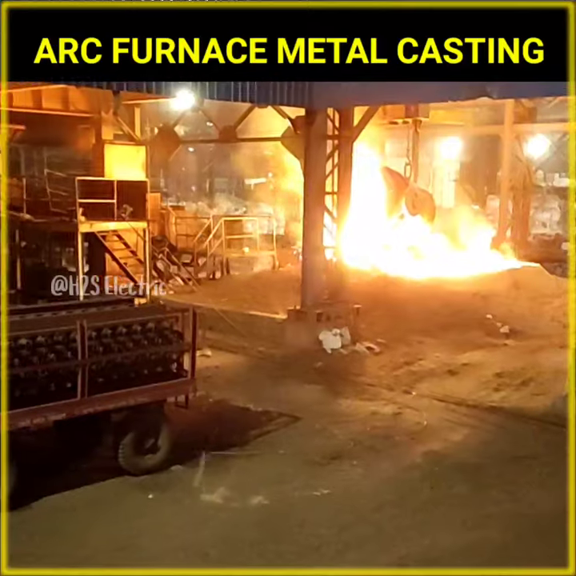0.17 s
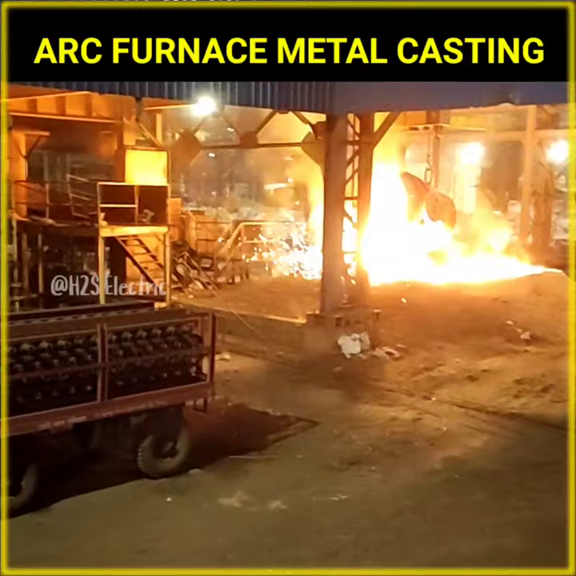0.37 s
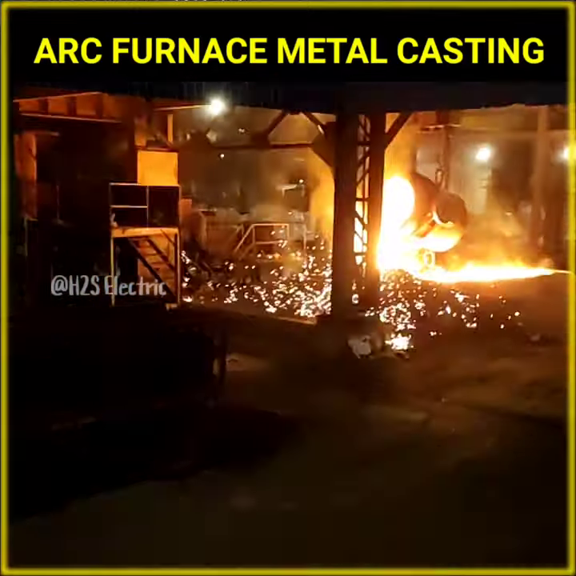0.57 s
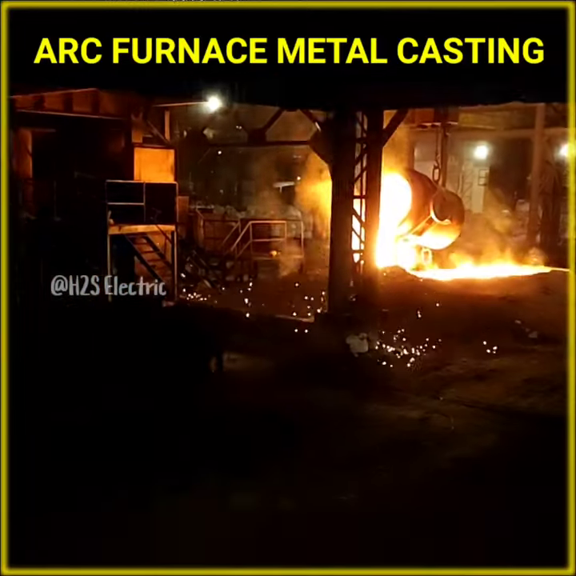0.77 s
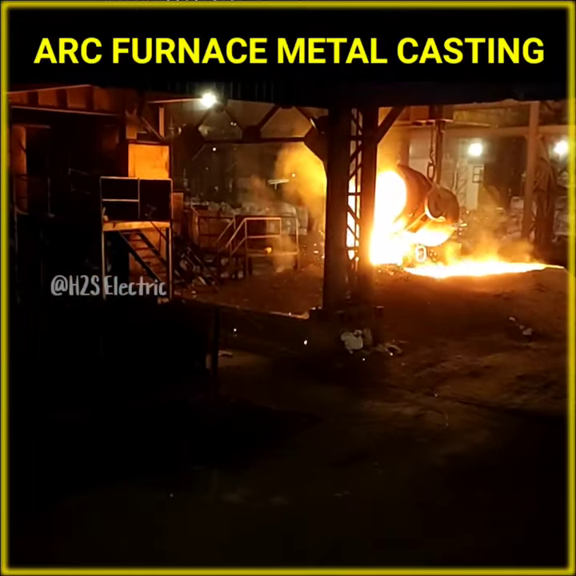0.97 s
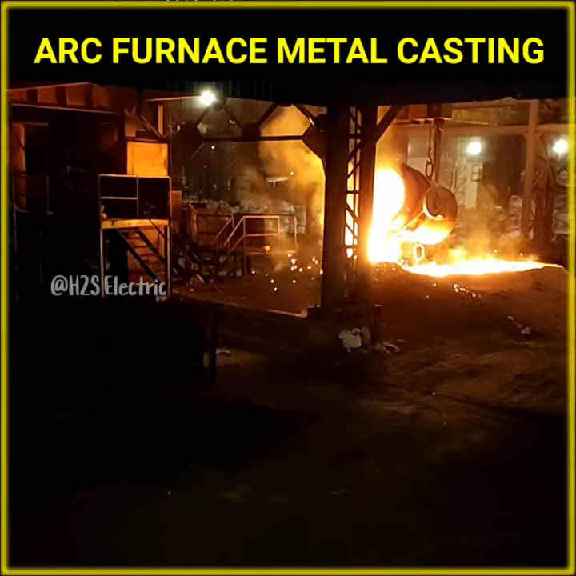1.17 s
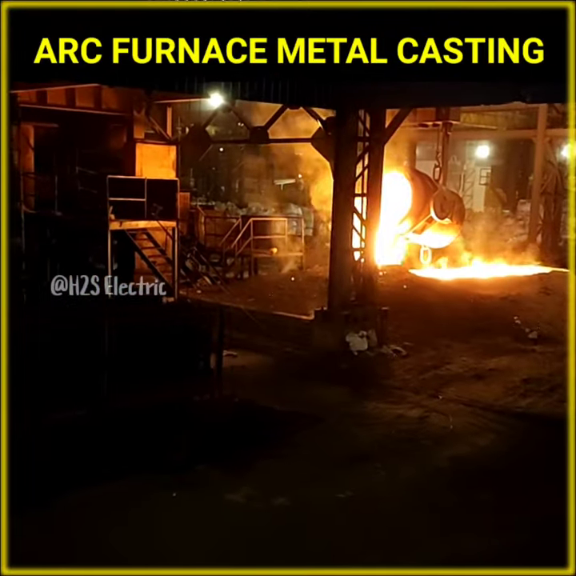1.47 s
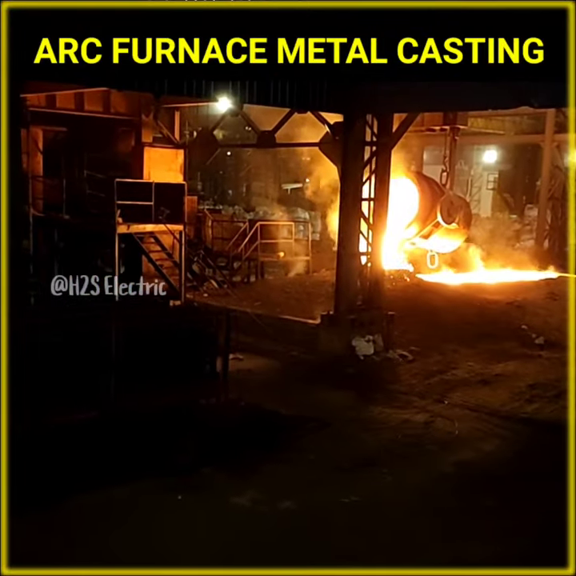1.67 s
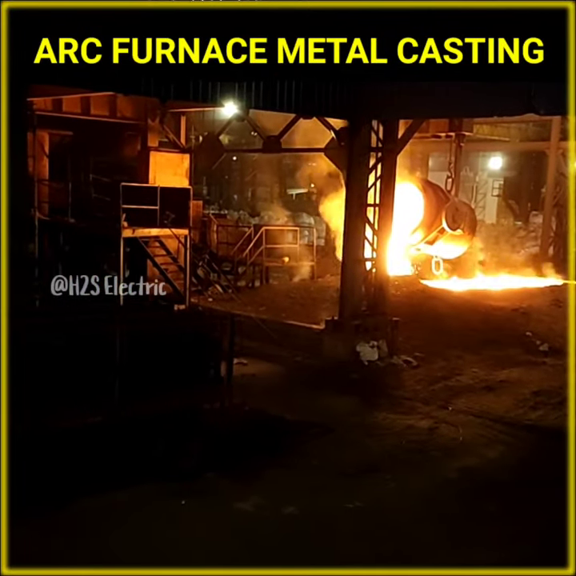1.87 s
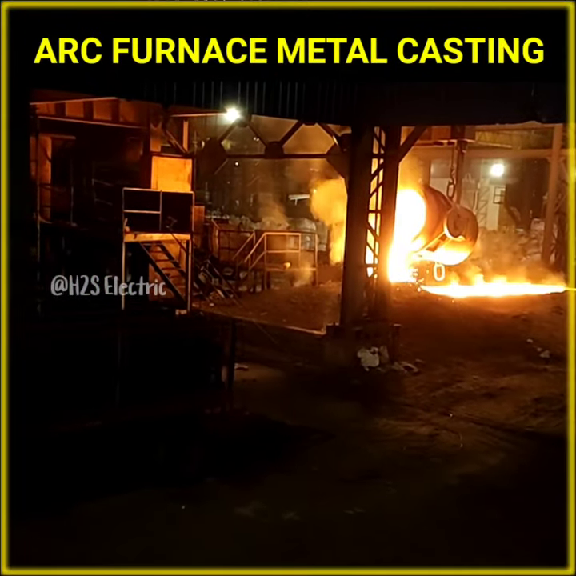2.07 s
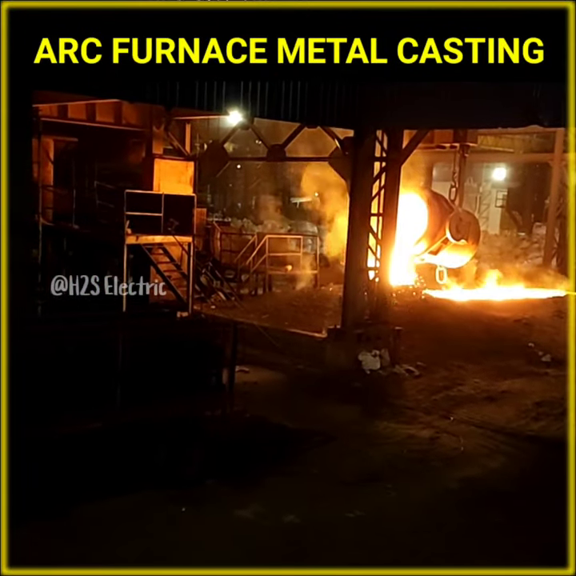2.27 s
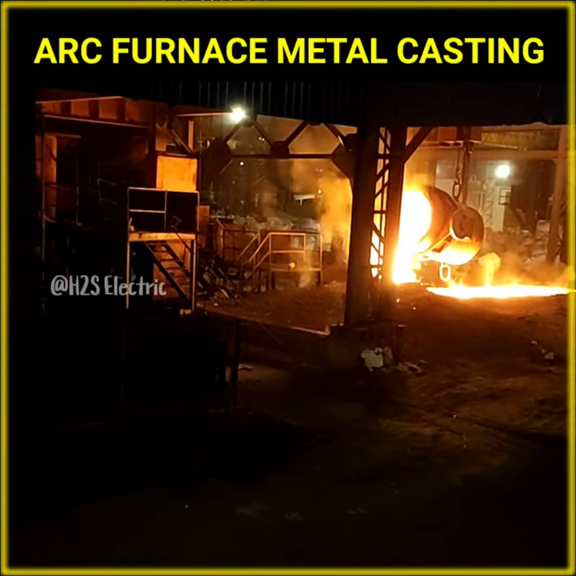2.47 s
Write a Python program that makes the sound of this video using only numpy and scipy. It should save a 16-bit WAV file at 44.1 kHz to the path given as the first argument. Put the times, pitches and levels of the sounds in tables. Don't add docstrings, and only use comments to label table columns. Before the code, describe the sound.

After a brief silence, a loud hollow furnace roar comes in and continues, fluttering unevenly with humming motors, airy hiss and faint steam spits, then a sharp puff of compressed air late on, heard by a phone in an echoing hall.

```python
import sys
import numpy as np
from scipy import signal
from scipy.io import wavfile
from scipy.ndimage import uniform_filter1d, minimum_filter1d

SR = 44100
rng = np.random.default_rng(int(sys.argv[2]) if len(sys.argv) > 2 else 0)


def to_wav(s):
    ch = np.atleast_2d(s).T
    pcm = np.round(np.clip(ch, -1, 1) * 32767)
    wavfile.write(sys.argv[1], SR, pcm.astype(np.int16))


def field_ratio(decibels):
    return 10 ** (np.asarray(decibels, dtype=float) / 20)


N = 115983


# pitch_hz, level_db (per Hz)
ROAR_COLOUR = [(12, -75), (20, -29), (86, -43), (195, -17.5), (259, -13), (350, -8), (433, -9.5),
               (586, -12.5), (1400, -21.5), (1820, -21.5), (3080, -120)]
# pitch_hz, width_hz, level_db
DUCT_BOOM = [
    (351.8, 27, -25),
    (329, 26, -30.5),
    (388, 6.7, -30),
]
# pitch_hz, width_hz, level_db
MOTOR_HUM = [(182, 5, -50), (202.5, 6, -38.5), (404, 8, -32), (495, 7, -37), (593, 9, -36.5),
             (808, 7, -40.5), (1217, 12, -47), (3570, 8, -61), (3746, 8, -64), (4269, 8, -66),
             (4576, 8, -66)]


def roar():
    tones_table = DUCT_BOOM + MOTOR_HUM

    def body_db(hz, t):
        return read(ROAR_COLOUR, hz)[:, None] + 2.0 * patches(hz, t, 12, 8) + 0.84 * draught(t)

    def tones_db(hz, t):
        power = 0
        for pitch_hz, width_hz, db in tones_table:
            off_pitch = 2 * (hz - pitch_hz) / width_hz
            power = power + field_ratio(db) ** 2 / width_hz / (1 + off_pitch ** 2) ** 2
        silent_top = 240 * (hz > 6000)[:, None]
        return 10 * np.log10(power)[:, None] + 0 * t - silent_top

    body = ports(body_db, 2048)
    low = signal.sosfilt(signal.butter(2, 1300, fs=SR, output="sos"), body)
    tones = ports(tones_db, 16384)
    tones_power = sum(field_ratio(db) ** 2 for _, _, db in tones_table)
    return field_ratio(-22) * evened(low) + np.sqrt(tones_power) * evened(tones)


# start_s, level_db (peak), pitch_hz
PUFF_EVENTS = [(0.211, -13, 347), (0.229, -12, 334), (0.364, -14, 423), (0.419, -7.5, 405),
               (0.461, -15, 352), (0.53, -11, 341), (0.586, -18, 360), (0.683, -14, 345), (0.761, -18, 336),
               (0.834, -6, 364.5), (0.909, -16, 349), (1.007, -12, 359), (1.037, -2.5, 356.6),
               (1.26, -12, 338), (1.287, -15, 398), (1.343, -14, 360), (1.442, -9, 353.5), (1.51, -18, 399),
               (1.535, -11, 353), (1.599, -13, 388), (1.657, -11.5, 380), (1.683, -16, 367),
               (1.725, -14, 349), (1.751, -14.5, 385), (1.801, -8.5, 357), (1.847, -11, 390),
               (1.908, -8.5, 351), (2.02, -17, 381), (2.083, -14.5, 394), (2.126, -11, 340),
               (2.165, -23, 326), (2.19, -12, 352.3), (2.261, -19, 336), (2.301, -10.5, 368),
               (2.334, -13.5, 335), (2.383, -19, 394), (2.474, -18, 388), (2.514, -11.5, 349),
               (2.565, -12, 328), (2.601, -15.5, 368)]


def puffs():
    rise_s, t60_s, trim_db = 0.0075, 0.16, -1.5
    t = np.arange(SR // 4) / SR
    out = np.zeros(N + SR)
    turns = rng.random(len(PUFF_EVENTS))
    for (start_s, db, pitch_hz), turn in zip(PUFF_EVENTS, turns):
        swell = 1 - np.exp(-(t / rise_s) ** 2)
        fade = field_ratio(db + trim_db - 60 * t / t60_s)
        start = round(start_s * SR)
        out[start:start + len(t)] += swell * fade * np.sin(2 * np.pi * (pitch_hz * t + turn))
    return out[:N] * field_ratio(np.array([[.5], [-.5]]) * read(PORT_LEAN, 350))


# pitch_hz, level_db (per Hz)
AIR_COLOUR = [(700, -2), (1400, -1), (3500, -8.5), (4000, -14.5), (8500, -23.5), (10500, -27.5),
              (13700, -33), (13900, -35.5)]


def air_rush():
    def air_db(hz, t):
        flicker = evened(uniform_filter1d(rng.standard_normal(len(t)), 10))
        bass_cut = -30 * np.maximum(np.log2(600 / (hz + 1)), 0)
        colour = (read(AIR_COLOUR, hz) + bass_cut)[:, None]
        return colour + 0.59 * patches(hz, t, 14, 12) + 0.43 * flicker + draught(t)
    return field_ratio(-29.5) * evened(ports(air_db, 512))


# time_s, level_db
DRAUGHT_CURVE = [(.25, 0.5), (.37, 1), (.46, -2), (.7, 0.5), (.88, -1.5), (1.0, -1.2), (1.2, 0.1),
                 (1.46, -1), (1.6, -0.75), (1.85, -0.5), (1.95, -0.8), (2.1, 0), (2.4, -1), (2.63, -0.2)]


def draught(t):
    return np.interp(t, *np.transpose(DRAUGHT_CURVE))


# time_s, level_db, sharpness (0 dull to 1 sharp)
VALVE_FLOW = [
    (2.1295, -55, 1),
    (2.132, -25.5, 1),
    (2.163, -29, 0.4),
    (2.19, -34, 0.5),
    (2.222, -34, 0.2),
    (2.258, -30.5, 0.1),
    (2.284, -37.5, 0.1),
    (2.315, -47, .2),
    (2.37, -71, .2),
]
# pitch_hz, level_db (per Hz)
SHARP_COLOUR = [(1500, -11), (4000, 0), (6000, -3), (8000, 0.5), (10500, -4), (13000, -3.5), (15500, -10)]
# pitch_hz, level_db (per Hz)
DULL_COLOUR = [(2000, -11), (3700, -4), (4300, 3.5), (5100, 3.5), (6000, -6), (7500, -4), (10000, -9),
               (15500, -9)]


def valve():
    same, lean_db, echo_db, hall_t60_s = 0.5, 0.6, -10, 0.6
    t = np.arange(N) / SR
    time_s, flow_db, sharpness = np.transpose(VALVE_FLOW)
    sharp = np.clip(np.interp(t, time_s, sharpness), 0, 1)
    gas = np.sqrt(sharp) * jet(SHARP_COLOUR, same) + np.sqrt(1 - sharp) * jet(DULL_COLOUR, same / 2)
    flow = field_ratio(np.interp(t, time_s, flow_db, left=-120, right=-120))
    direct = gas * flow * field_ratio(np.array([[.5], [-.5]]) * lean_db)
    tail_t = np.arange(SR // 2) / SR
    tail = rng.standard_normal((2, SR // 2)) * field_ratio(-60 * tail_t / hall_t60_s)
    tail = signal.lfilter([1], [1, -.45], tail)
    tail = tail / np.linalg.norm(tail[0])
    echo = signal.fftconvolve(direct, tail, axes=1)[:, :N]
    return direct + field_ratio(echo_db) * echo


def jet(colour, same):
    def jet_db(hz, t):
        bass_cut = 20 * np.maximum(np.log2(1500 / (hz + 1)), 0)
        return (read(colour, hz) - bass_cut)[:, None] + 1.0 * patches(hz, t, 10, 8)
    return evened(ports(jet_db, 256, same))


# start_s, length_s, level_db
SPIT_EVENTS = [(0.337, 0.11, -44.5), (.66, .05, -53), (.93, 0.065, -43), (1.148, 0.038, -42.5),
               (1.918, .05, -46), (2.552, 0.11, -42.5)]
# pitch_hz, level_db (per Hz)
SPIT_COLOUR = [(2000, -19), (4500, -2), (7500, -4.5), (9500, -9), (15000, -24)]


def spits():
    t = np.arange(N) / SR
    humps = np.zeros(N)
    for start_s, length_s, db in SPIT_EVENTS:
        progress = np.clip((t - start_s) / length_s, 0, 1)
        humps += field_ratio(db) * np.sin(np.pi * progress ** 0.57)
    return humps * jet(SPIT_COLOUR, 0.24)


# pitch_hz, likeness (0 to 1)
PORT_LIKENESS = [(75, .55), (135, .99), (370, .985), (640, .83), (1410, .62), (3500, .15), (9000, .17),
                 (13000, .3)]
# pitch_hz, level_db
PORT_LEAN = [(40, -1), (130, 0), (300, 0.66), (640, -1), (1410, -0.3), (3100, -3.5), (5000, -3.5),
             (8000, 1)]
# pitch_hz, lead_radians
PORT_LEAD = [(400, 0), (950, .25), (2240, .9), (3800, 1.8), (6000, 4.1), (9000, 7.4), (12500, 12),
             (15700, 13)]


def ports(shape, size, same=None):
    hop = size // 4
    frames, hz = N // hop + 5, np.fft.rfftfreq(size, 1 / SR)
    a, b, c, d = rng.standard_normal((frames, len(hz), 4)).T
    likeness = read(PORT_LIKENESS, hz) if same is None else same + 0 * hz
    alike = np.clip(likeness, 0, 1)[:, None]
    lean = field_ratio(read(PORT_LEAN, hz) / 2)[:, None]
    left = a + 1j * b
    delayed = left * np.exp(-1j * read(PORT_LEAD, hz))[:, None]
    right = alike * delayed + np.sqrt(1 - alike ** 2) * (c + 1j * d)
    level = field_ratio(shape(hz, np.arange(frames) * hop / SR))
    spectra = np.array([left * lean, right / lean]) * level
    return signal.istft(spectra, nperseg=size, noverlap=size - hop)[1][:, :N]


def patches(hz, t, wide, long):
    field = rng.standard_normal((len(t), len(hz))).T
    across_pitch = uniform_filter1d(field, wide, 0)
    return evened(uniform_filter1d(across_pitch, long, 1))


def evened(x):
    return x / np.sqrt(np.mean(x ** 2) + 1e-20)


def read(points, hz):
    pitch_hz, value = np.transpose(points)
    return np.interp(np.log(hz + 1), np.log(pitch_hz + 1), value)


def scene():
    return roar() + puffs() + air_rush() + valve() + spits()


def band_limit(x):
    return signal.sosfilt(signal.butter(12, 16120, fs=SR, output="sos"), x)


# time_s, level_db
FADE_UP = [
    (.155, -7),
    (.18, -9.5),
    (.2, -4),
    (.225, 0),
]


def record(dry):
    limit_db, limit_share, recover_db_per_s = -9.5, 0.8, 300
    open_s, top_hz = 0.1545, 15470
    t = np.arange(N) / SR
    fall = t * recover_db_per_s
    peak_db = 20 * np.log10(abs(dry).max(0) + 1e-9)
    held_peak_db = np.maximum.accumulate(peak_db + fall) - fall
    over_db = np.maximum(held_peak_db - limit_db, 0)
    ahead_db = uniform_filter1d(-minimum_filter1d(-over_db, size=120), size=120)
    held = dry / field_ratio(limit_share * ahead_db)
    opening = np.clip((t - open_s) / 0.0023, 0, 1)
    opened = held * opening * field_ratio(np.interp(t, *np.transpose(FADE_UP)))
    opened = signal.sosfilt(signal.butter(2, 70, "high", fs=SR, output="sos"), opened)
    low_pass = signal.firwin(511, top_hz, window=("kaiser", 9), fs=SR)
    band = signal.oaconvolve(opened, low_pass[None], "same")
    return band_limit(band)


dry = scene()
out = record(dry)
to_wav(out)
```